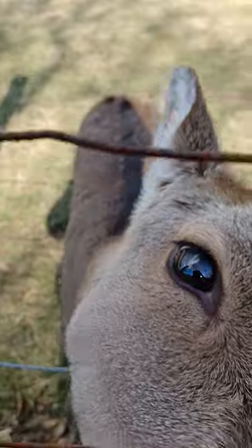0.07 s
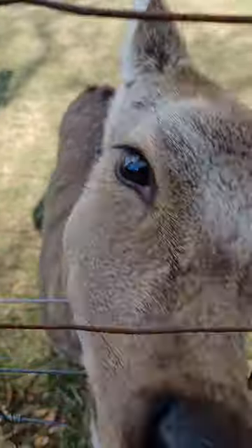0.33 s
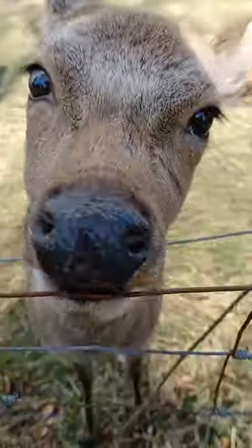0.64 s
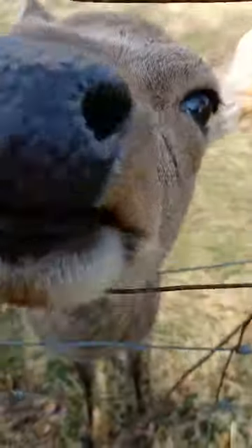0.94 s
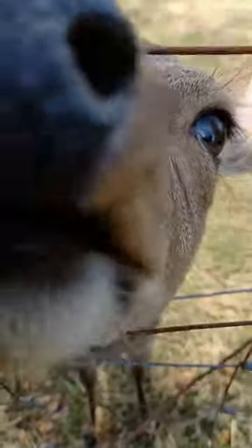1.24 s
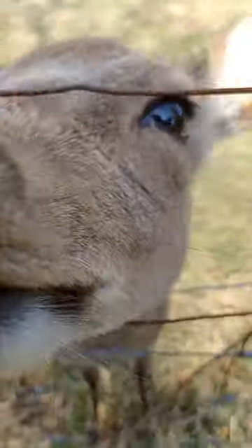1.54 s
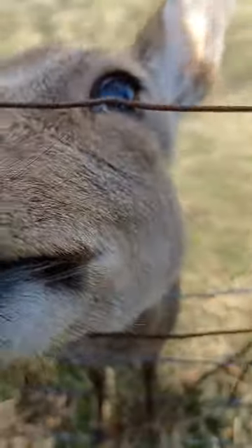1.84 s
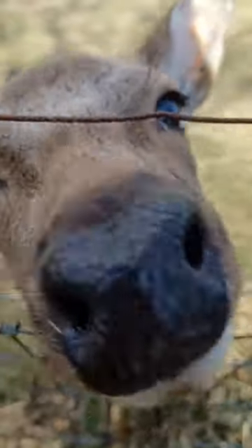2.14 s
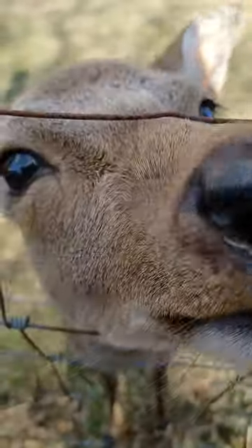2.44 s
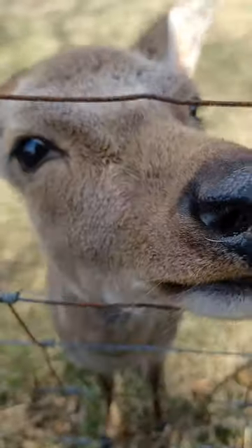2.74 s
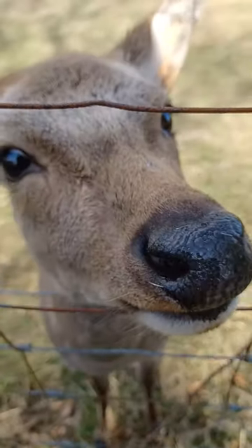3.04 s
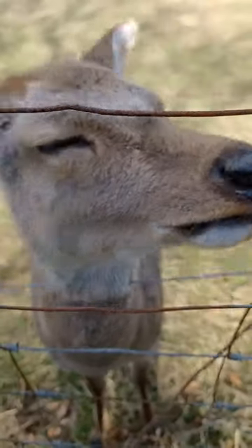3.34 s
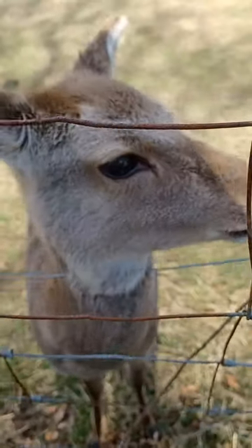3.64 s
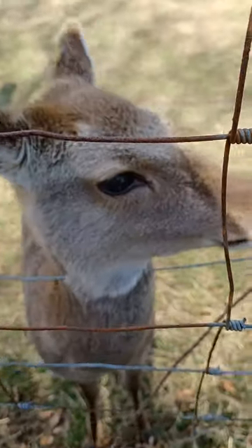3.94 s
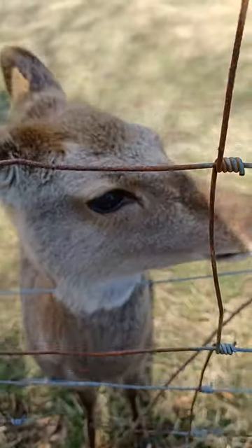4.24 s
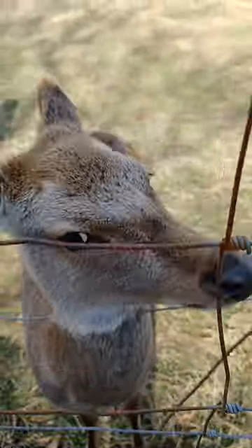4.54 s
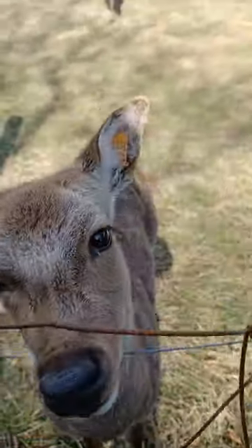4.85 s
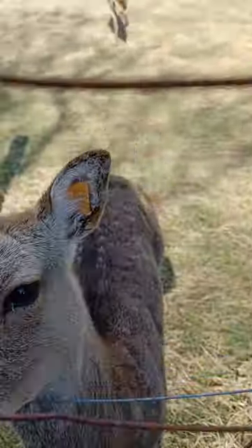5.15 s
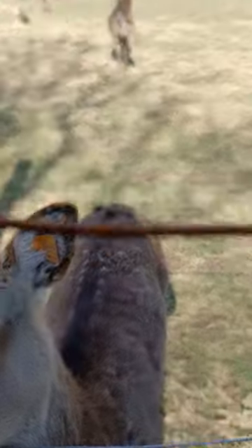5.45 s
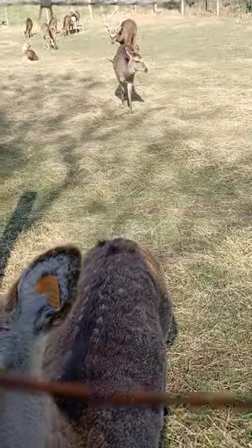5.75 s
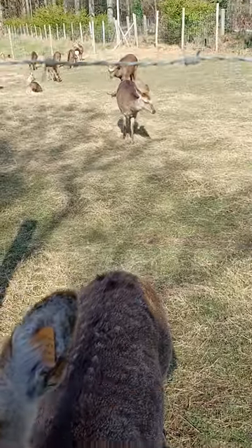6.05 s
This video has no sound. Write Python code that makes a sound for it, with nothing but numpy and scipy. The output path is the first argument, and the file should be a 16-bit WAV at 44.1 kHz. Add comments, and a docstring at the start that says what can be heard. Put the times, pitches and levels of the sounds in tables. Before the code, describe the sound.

A deer very close to the microphone gives a high, drawn-out whine that sinks and fades with a little rasp, then whimpers softly. Air rumbles and hisses on the microphone, a dull handling bump lands, and the deer puffs and sniffs. A second falling whine turns rough and cracked and trails into another whimper. Soft knocks come and go over the faint wash of an open field.

```python
"""In an open field a deer at a wire fence whines, its nose almost on a hand-held phone. Its vocal folds
give a squeal that sinks and fades with a little rasp; a whimper follows. Near 2 s the case takes its
hardest bump, and the deer puffs and sniffs through its nostrils. At 3.8 s a second whine begins, splits
into half-pitch lines and rasp as it falls, and leads to another whimper. Along the way air buffets and
hisses over the two microphone ports and soft knocks ring the case, above a faint, distant wash."""
import sys
import numpy as np
from scipy import signal
from scipy.fft import rfft, irfft, next_fast_len
from scipy.io import wavfile
from scipy.ndimage import uniform_filter1d, minimum_filter1d, map_coordinates

SR = 44100
rng = np.random.default_rng(int(sys.argv[2]) if len(sys.argv) > 2 else 0)


def put_to_file(sound):
    """Save the sound as 16-bit audio at rate SR, in the file named by the first command-line argument."""
    columns = np.atleast_2d(sound).T  # one column per channel
    safe = np.clip(columns, -1, 1)
    whole_steps = np.round(safe * 32767)
    wavfile.write(sys.argv[1], SR, whole_steps.astype(np.int16))


N = 273861
T = np.arange(N) / SR


def undb(db):
    """Decibels to amplitude ratio."""
    return 10 ** (np.asarray(db) / 20)


def unit(x):
    """Normalisation to rms 1."""
    return x / np.sqrt(np.mean(x ** 2))


def curves(table):
    """Linear interpolation of a timed table's columns, one value a sample."""
    s, *columns = np.transpose(table)
    return [np.interp(T, s, c) for c in columns]


def colour_db(points, hz):
    """Interpolation of a spectrum on a log-frequency axis."""
    f, db = np.transpose(points)
    return np.interp(np.log(np.maximum(hz, 1)), np.log(f), db)


def shape(x, *spectra):
    """Filters in cascade: their decibels add. The result has rms 1."""
    size = next_fast_len(N)
    db = sum(colour_db(points, np.fft.rfftfreq(size, 1 / SR)) for points in spectra)
    return unit(irfft(rfft(x, size) * undb(db), size)[:N])


def port_noise(points):
    """Coloured noise, incoherent between the two ports."""
    return np.array([shape(rng.standard_normal(N), points) for _ in range(2)])


def walk(rate, t=T):
    """Random modulation of rms 1, with rate new values a second."""
    values = rng.standard_normal(SR // 4)
    return unit(np.interp(t * rate, np.arange(len(values)), values))


def pan(db):
    """Left and right gains for a level difference."""
    return undb(np.array([db, -db]).reshape(2, -1) / 2)


def swell(s, rise, fall):
    """A triangular envelope of height 1."""
    return np.interp(T, [s, s + rise, s + rise + fall], [0, 1, 0])


def field(bed_db=-71, incoherent_db=-6, waver_db=2):
    """Partial coherence: a distant, wavering wash, mostly alike at both ports, over a steady bed."""
    # Spectra of the open-country bed and the wash. Each row: frequency in Hz, relative level in dB.
    bed_colour = [(40, -9), (100, -3), (200, 0), (450, -6), (900, -7), (1500, -22), (2500, -25.5),
                  (5000, -30), (7300, -26.5), (10000, -33), (15000, -26)]
    wash_colour = [(100, -12.5), (250, -1), (450, -17), (780, -3), (1050, -9), (1400, -19.5), (2000, -28),
                   (3000, -44), (8000, -44.5)]
    # Course of the wash. Each row: time in seconds, level in dB.
    wash_levels = [(0, -65), (2.5, -68), (3.2, -91), (3.8, -69), (5.2, -61.5), (5.55, -70), (5.8, -71.5),
                   (6.05, -65.5), (6.2, -62.5)]
    db, = curves(wash_levels)
    wash = shape(rng.standard_normal(N), wash_colour) + undb(incoherent_db) * port_noise(wash_colour)
    bed = shape(rng.standard_normal(N), bed_colour) + port_noise(bed_colour)
    return unit(wash) * undb(db + waver_db * walk(20)) + unit(bed) * undb(bed_db)


def buffet(gain_db=-1, gusts_per_s=10, gust_db=2.5, eddy_db=2):
    """Turbulent pressure: gusts reach both ports together, eddies rumble on each separately."""
    # Wind on the ports. Each row: time in seconds, left and right relative levels in dB.
    wind_levels = [(0.06, -37.5, -36), (0.22, -25.5, -19.5), (0.5, -30.5, -24), (0.8, -29.5, -26.5),
                   (1.6, -27.5, -26.5), (1.94, -46, -23.5), (1.98, -18, -21.5), (2.11, -28.5, -25.5),
                   (2.17, -32.5, -46), (2.42, -36, -34.5), (2.55, -41.5, -53.5), (2.95, -50, -56),
                   (3.19, -64, -65), (3.33, -54.5, -50.5), (3.75, -45, -54), (4.0, -39.5, -43.5),
                   (4.74, -46, -49.5), (4.88, -79, -70)]
    # Its spectrum. Each row: frequency in Hz, relative level in dB.
    wind_colour = [(15, -51), (30, -34.5), (45, -5.5), (62, -7.5), (80, 1), (105, 2), (130, -1),
                   (165, -6.5), (250, -12), (320, -25.5), (420, -30.5), (600, -40.5), (1000, -45.5),
                   (2000, -85)]
    turbulence = undb(gust_db * walk(gusts_per_s) + eddy_db * np.array([walk(45), walk(50)]))
    return unit(port_noise(wind_colour) * turbulence) * undb(np.array(curves(wind_levels)) + gain_db)


def hiss(gain_db=8.5, flutter_db=2):
    """Flow noise: air from the muzzle grazes the ports."""
    # Each row: start, rise and fall in seconds, relative level in dB, left minus right in dB.
    breaths = [(0.12, 0.055, 0.12, -70, -6), (0.26, 0.13, 0.25, -69, -5), (0.42, 0.095, 0.34, -54.5, 3.5),
               (0.6, 0.23, 0.49, -69, 7), (0.923, .05, 0.05, -58.5, 10), (1.0, .11, 0.14, -63, -2.5),
               (1.19, 0.066, 0.1, -67, -3), (1.639, 0.046, 0.054, -73, -3), (0.9, 1, 0.54, -78.5, 3.5),
               (1.971, 0.051, 0.18, -84.5, 7)]
    # Their spectrum. Each row: frequency in Hz, relative level in dB.
    breath_colour = [(500, 2), (1500, -1.5), (3000, -0.5), (6000, 1), (9000, -2.5), (12000, -0.5),
                     (15500, -2)]
    flow = sum(swell(s, rise, fall) * undb(db) * pan(pan_db) for s, rise, fall, db, pan_db in breaths)
    return port_noise(breath_colour) * flow * undb(gain_db + flutter_db * walk(60))


def thumps(gain_db=-4, push_s=0.0028, detune=0.17):
    """Damped free vibration: soft knocks ring the low modes of the phone in the hand."""
    # Each row: start in seconds, relative peak in dB, left minus right in dB.
    knocks = [(0.08, -20, -10), (0.169, -16.5, 11), (0.268, -11.5, -12.5), (1.19, -32, 13), (1.7, -18, -27),
              (1.873, -23.5, -31), (1.937, -19.5, -19), (1.974, -1, 29), (2.038, -13, 23),
              (2.315, -18, 3.5), (2.454, -36.5, -3.5), (2.749, -29.5, 3), (2.89, -35, 3.5),
              (3.283, -36.5, 8.5), (3.346, -29.5, 4.5), (3.631, -35, -3), (3.699, -30.5, -1),
              (3.913, -23, -1), (3.945, -26.5, -5), (4.005, -26, 7), (4.316, -31, -6.5), (4.412, -24, -4),
              (4.522, -34.5, 12), (4.593, -37, 7), (4.74, -43, -5), (4.957, -46.5, 6)]
    # Each row: mean frequency in Hz, relative level in dB, time to decay by 60 dB in seconds.
    case_modes = [(108, 1.5, 0.072), (143, -8, 0.089), (227.4, 2, 0.0363), (345, -24.5, 0.11)]
    hz, mode_db, t60 = np.transpose(case_modes)[:, :, None]
    out, t = np.zeros((2, N)), T[:SR // 5]
    decay = undb(mode_db) * np.exp(-np.log(1000) * t / t60)
    for s, db, pan_db in knocks:
        detuned_hz = hz * (1 + detune * rng.standard_normal((2, len(case_modes), 1)))
        ring = (decay * np.sin(2 * np.pi * detuned_hz * t)).sum(1)
        ring *= (1 - np.exp(-t / push_s)) ** 2
        start = int(s * SR)
        out[:, start:start + len(t)] += ring / np.abs(ring).max() * undb(db + gain_db) * pan(pan_db)
    return out


def puffs(flutter_db=2):
    """Jet noise: short, fluttering jets from the nostrils, each with one broad resonance."""
    # Each row: start, rise and fall in seconds, level in dB, centre and width in Hz,
    # left minus right in dB.
    jets = [(0.405, 0.013, 0.25, -49, 1160, 1900, 5.5), (1.973, .008, 0.14, -39.5, 390, 565, 16.5),
            (1.98, 0.078, 0.16, -61.5, 1100, 2210, 9.5), (2.346, 0.03, 0.094, -61.5, 6000, 11300, 12.5),
            (2.518, 0.075, 0.13, -64, 2510, 10800, 9), (4.385, 0.022, 0.06, -55, 11500, 12000, -4)]
    out, f = np.zeros((2, N)), np.fft.rfftfreq(N, 1 / SR) + 1
    for s, rise, fall, db, hz, width, pan_db in jets:
        resonance = 1 / (1 + 1j * (f - hz ** 2 / f) / width) ** 2
        jet = unit(irfft(rfft(rng.standard_normal((2, N))) * resonance, N))
        out += jet * swell(s, rise, fall) * undb(db + flutter_db * walk(130)) * pan(pan_db)
    return out


def scatter(x, t60=0.47, wet_db=-24):
    """Scattering: ground and trees send back a faint tail that decays exponentially."""
    t = T[:SR // 2]
    tail = rng.standard_normal((2, len(t))) * np.exp(-np.log(1000) * t / t60) * (t > .006)
    tail /= np.sqrt((tail ** 2).sum(1, keepdims=True))
    return undb(wet_db) * signal.fftconvolve(x, tail, axes=1)[:, :N]


def breaks(clean_half_db=-32, clean_rasp_db=-29, edge_s=0.014):
    """Period doubling and chaos: the relative amplitudes of half-pitch lines and of rasp over time."""
    # Each row: start and length in seconds, half-pitch lines and rasp in dB relative to the voice.
    voice_breaks = [(0.062, .12, -27, -9), (0.26, 0.17, -19, -28), (0.493, .035, -22, -11.5),
                    (0.754, 0.29, -39, -25.5), (0.984, .2, -27, -15), (3.808, .13, -22.5, -9),
                    (4.093, 0.1053, -31, -30.5), (4.193, 0.0837, -12, -23), (4.287, 0.064, 4, -6.5),
                    (4.34, 0.041, -15, -15), (4.373, .06, 3.5, -4.5), (4.43, .195, -10, -16.5),
                    (4.637, 0.15, -1.5, -10.5), (4.792, 0.12, -3, -6), (4.943, 0.1, -15, -12.5),
                    (5.133, 0.245, 1.5, -4), (5.38, 0.1367, -26, -14)]
    half, rasp = undb(clean_half_db), undb(clean_rasp_db)
    for s, length, half_db, rasp_db in voice_breaks:
        held = np.clip(.5 + np.minimum(T - s, s + length - T) / edge_s, 0, 1)
        half, rasp = half + held * undb(half_db), rasp + held * undb(rasp_db)
    return half, rasp


def whine(contour, voice, throat, lag_ms, pan_db, jitter=0.0051, rough_jitter=0.011, crack=.022,
          shimmer_db=0.95, stutter_db=1.45, flare_db=4.0, rasp_flicker_db=2):
    """Source and filter: vocal folds pulse through the throat; unequal cycles add half-pitch lines."""
    full_db, squeal_hz = -28, 1550  # the reference: a full squeal
    hz, db = curves(contour)
    first_db, second_db, second_rise, upper_db, tilt_start, tilt_end = voice
    start, end = contour[0][0], contour[-1][0]
    tilt = np.interp(T, [start, end], [tilt_start, tilt_end])
    gate = np.clip(1 + np.minimum(T - start, end - T) / 0.058, 0, 1)
    on = gate > 0
    # In a break the upper partials give way to half-pitch lines and rasp.
    half, rasp = breaks()
    strength = undb(db) / np.sqrt(1 + half ** 2 + rasp ** 2)
    # A rough voice has uneven cycles, and its pitch cracks in small steps.
    roughness = np.minimum(rasp, 1)
    wobble = jitter * walk(130) + roughness * (rough_jitter * walk(700) + crack * np.tanh(4 * walk(45)))
    phase = 2 * np.pi * np.cumsum(hz * (1 + wobble)) / SR

    def pulses(multiples):
        """Superposition: partials in phase, weighted by the throat, form pulses of power 1."""
        f = multiples[:, None] * hz[on]
        partial_db = colour_db(throat, f) + tilt[on] * np.log2(np.minimum(f, 10000) / 4000)
        # The pulse shape keeps changing, so single partials flare and fade.
        partial_db += flare_db * (.5 + roughness[on]) * np.array([walk(35, T[on]) for _ in multiples])
        gain = undb(partial_db) * np.clip((14000 - f) / 4000, 0, 1)
        out = np.zeros(N)
        out[on] = (gain * np.cos(multiples[:, None] * phase[on])).sum(0) / np.sqrt((gain ** 2).sum(0) / 2)
        return out

    # The folds' smooth swing gives the two lowest harmonics, their snapping shut the rest.
    octaves = np.log2(hz / squeal_hz)
    first = undb(first_db + 0.38 * (db - full_db) + 6.5 * octaves)
    second = undb(db + second_db + second_rise * octaves)
    swing = np.sqrt(2) * (first * np.cos(phase) + second * np.cos(2 * phase))
    snap = undb(upper_db) * pulses(np.arange(3, 15)) + half * pulses(np.arange(1.5, 13))
    shimmer = undb((shimmer_db + stutter_db * roughness) * walk(90))
    tone = (swing + strength * snap) * shimmer
    # Air escapes once a cycle. Each row of its spectrum: frequency in Hz, relative level in dB.
    rasp_colour = [(1000, 0), (2200, -7), (3200, -9), (4500, -6.5), (6000, -5.5), (8000, 11.5), (14000, 5)]
    air = shape(rng.standard_normal(N) * (1 + np.cos(phase)), rasp_colour, throat)
    left = gate * (tone + air * strength * rasp * undb(rasp_flicker_db * walk(200)))
    right = map_coordinates(left, [np.arange(N) - lag_ms * SR / 1000], order=3)
    return np.array([left, right]) * pan(pan_db)


def deer():
    """Phonation in four phrases: whine, whimper, whine, whimper."""
    # One contour a phrase. Each row: time in seconds, pitch in Hz, nominal level in dB.
    contours = [
        [(0.08, 1458, -72), (0.14, 1560, -75.5), (0.19, 1590, -57), (0.25, 1613, -42.5), (0.31, 1733, -38.5),
         (0.45, 1644, -37), (0.53, 1499, -41), (0.59, 1449, -36.5), (0.68, 1328, -31), (0.72, 1245, -39),
         (0.815, 1020, -29), (0.84, 945, -29.5), (0.93, 772, -32.5), (1.01, 715, -46), (1.09, 748, -49.5),
         (1.19, 705, -54)],
        [(1.225, 857, -49.5), (1.32, 884, -54), (1.42, 834, -70), (1.59, 873, -68.5), (1.625, 900, -61.5),
         (1.65, 903, -49.5), (1.8, 906, -54.5), (1.93, 876, -66.5)],
        [(3.8, 1095, -86.5), (3.87, 1172, -74.5), (3.91, 1351, -62), (3.95, 1643, -43), (4.0, 1488, -39),
         (4.06, 1437, -39), (4.11, 1469, -32), (4.16, 1466, -33), (4.275, 1322, -37.5), (4.315, 1202, -38),
         (4.36, 1316, -40.5), (4.45, 1104, -32.5), (4.52, 1065, -31.5), (4.615, 1019, -34.5),
         (4.64, 935, -34.5), (4.72, 846, -35), (4.8, 734, -42), (4.92, 731, -45.0), (5.1, 725, -46.5)],
        [(5.13, 762, -44), (5.21, 782.4, -47.5), (5.37, 770, -53.5), (5.395, 923, -55.5), (5.45, 910, -56.5),
         (5.49, 853, -62)],
    ]
    # Each row, one a phrase: fundamental of a full squeal in dB, second harmonic in relative dB, its
    # rise with pitch in dB per octave, upper harmonics in relative dB, tilt at start and end in dB
    # per octave.
    voices = [(-47.5, -2, 26, -3, 24, -8.5), (-44, -0.29, 2.9, -14, -4.5, 2.5), (-47, -1.5, 10, -4, -2, 10),
              (-48, -4, 9, -6, 8, -23)]
    # Resonances of throat and nose, one set a phrase. Each row: frequency in Hz, relative gain in dB.
    throats = [
        [(1200, -46), (1900, -2.5), (2400, -6), (2900, -2.5), (3300, 11.5), (3800, 1.5), (4400, 1), (5000, 2),
         (5600, -12.5), (6300, -10), (7000, -19), (8000, -25), (9500, -34.5), (12000, -38.5)],
        [(1800, 20), (2700, -19), (3550, -2), (4500, -15), (5400, -28.5), (9000, -30)],
        [(1200, -29), (1900, 0), (2400, -10), (2900, 2), (3300, 3.5), (3800, -8.5), (4400, 2), (5000, 0.5),
         (5600, -5.5), (6300, -10.5), (7000, -19), (8000, -28.5), (9500, -29.5), (12000, -42)],
        [(1200, -24), (1950, 5.5), (2500, 3), (3200, -1.5), (4300, 3.5), (4900, -2), (5700, -14.5), (8000, -28),
         (12000, -76)],
    ]
    # Muzzle position in each phrase. Each row: lag of the right port in ms, left minus right in dB.
    places = [(0.3704, 4.5), (0.38, -0.5), (0.26, 4), (0.2, 3)]
    return sum(whine(contour, voice, throat, *place)
               for contour, voice, throat, place in zip(contours, voices, throats, places))


def scene():
    """Superposition at the ports: the deer in front, air and knocks on the phone, the field behind."""
    calls = deer()
    return calls + scatter(calls) + buffet() + hiss() + puffs() + thumps() + field()


def record(dry, start_s=0.064, low_cut_hz=56, top_hz=15800, ceiling=.82):
    """Band and peak limiting: the phone opens its input, cuts deep bass, limits peaks and cuts the top."""
    opened = dry * np.clip((T - start_s) / 0.0015, 0, 1)
    lean = signal.sosfilt(signal.butter(3, low_cut_hz, "highpass", fs=SR, output="sos"), opened)
    hold = SR // 100
    needed_gain = ceiling / np.maximum(np.abs(lean), ceiling)
    gain = uniform_filter1d(minimum_filter1d(needed_gain, hold), hold)
    return signal.sosfilt(signal.ellip(10, .2, 80, top_hz, fs=SR, output="sos"), lean * gain)


dry = scene()
out = record(dry)
put_to_file(out)
```